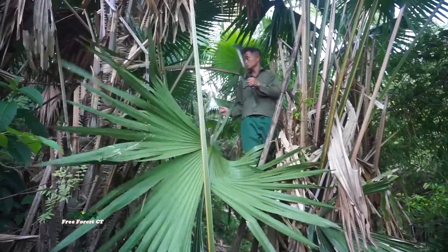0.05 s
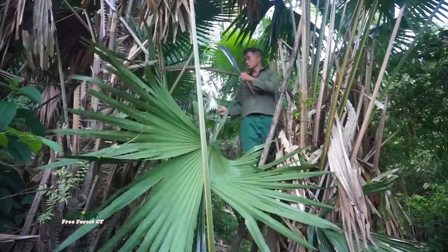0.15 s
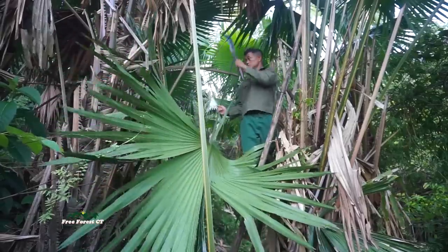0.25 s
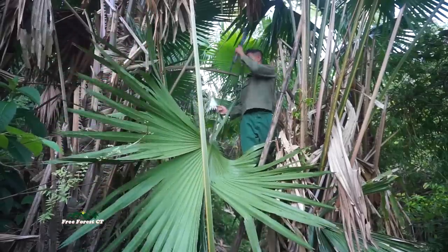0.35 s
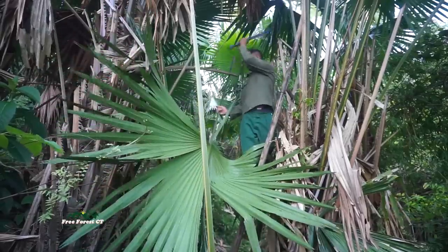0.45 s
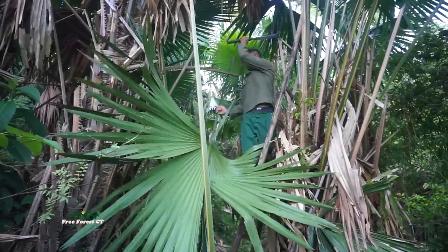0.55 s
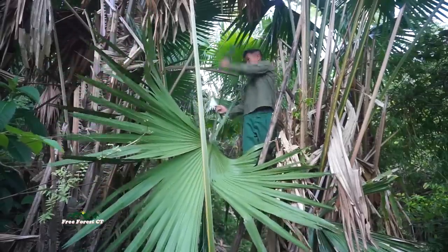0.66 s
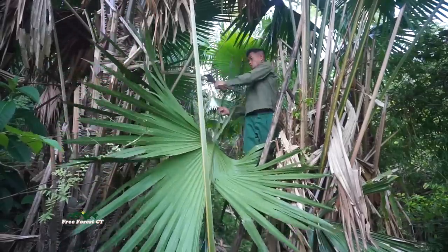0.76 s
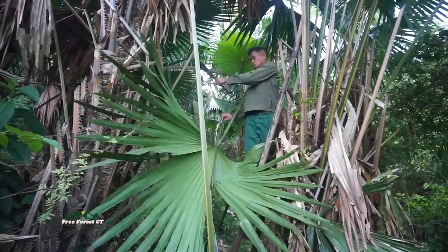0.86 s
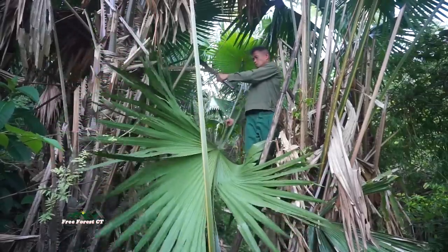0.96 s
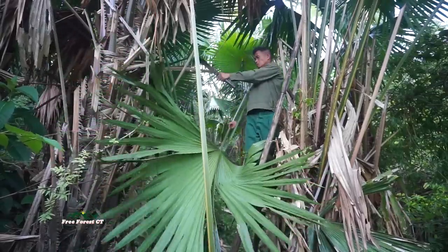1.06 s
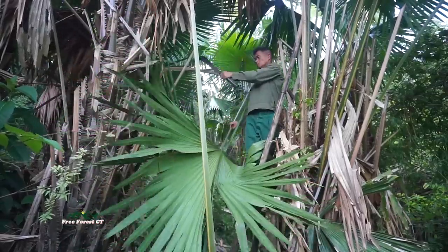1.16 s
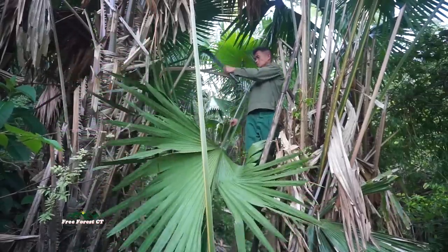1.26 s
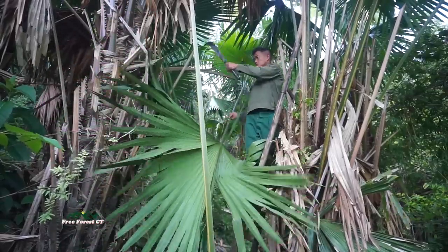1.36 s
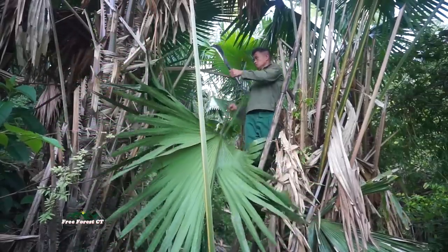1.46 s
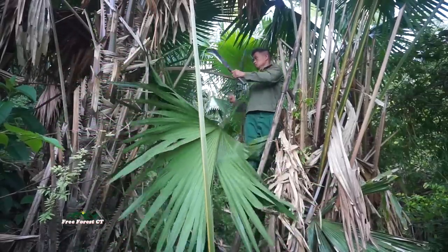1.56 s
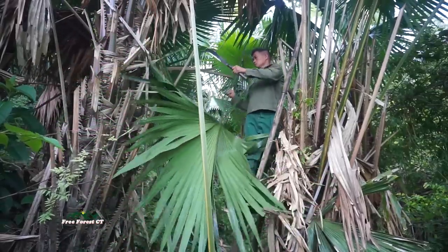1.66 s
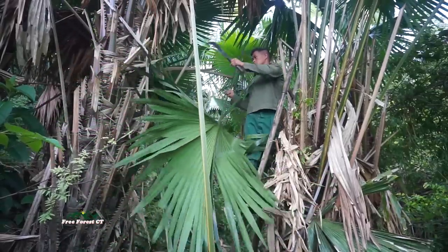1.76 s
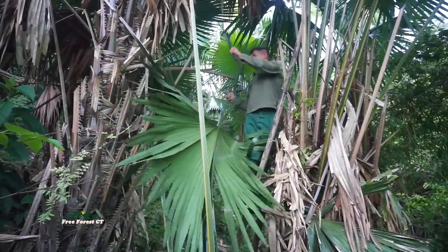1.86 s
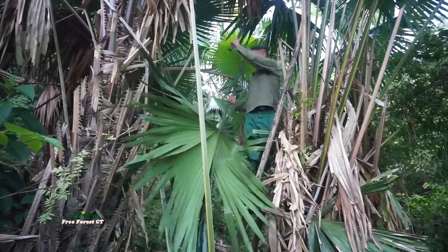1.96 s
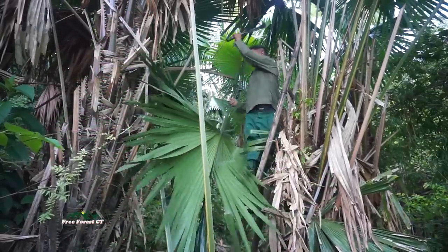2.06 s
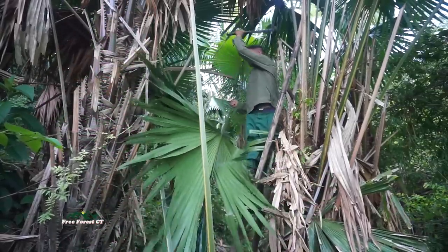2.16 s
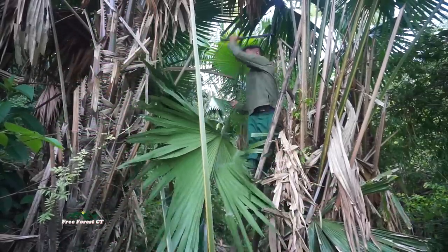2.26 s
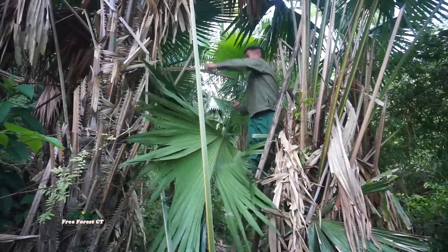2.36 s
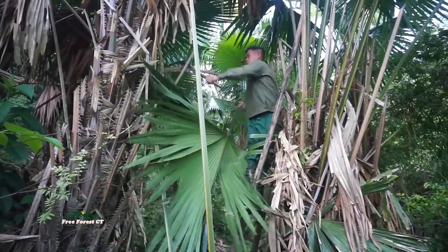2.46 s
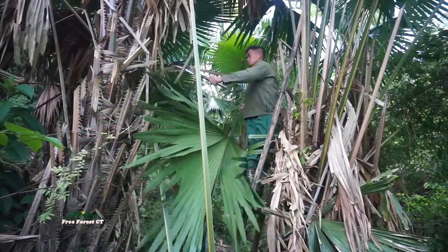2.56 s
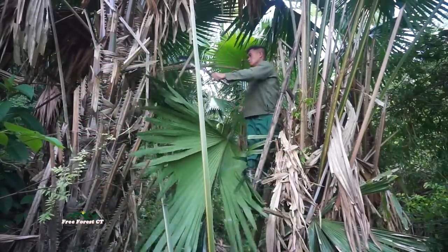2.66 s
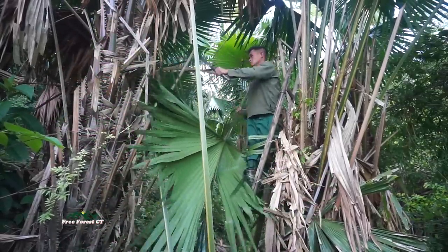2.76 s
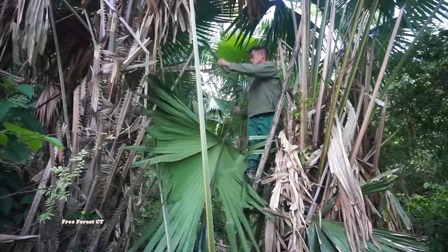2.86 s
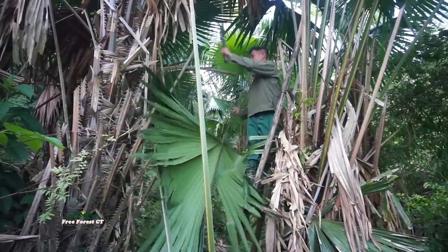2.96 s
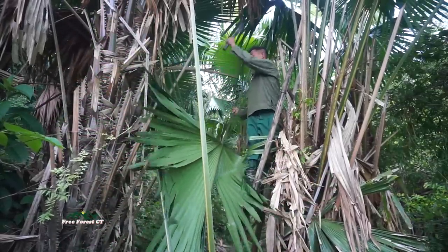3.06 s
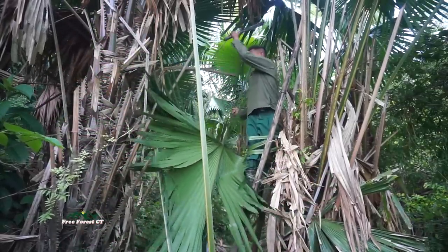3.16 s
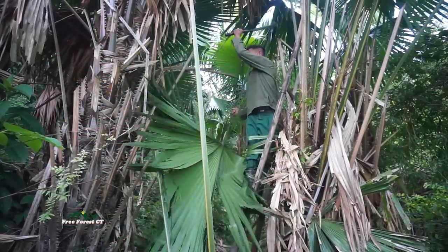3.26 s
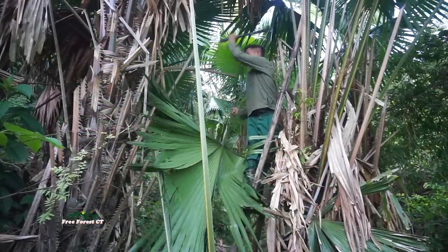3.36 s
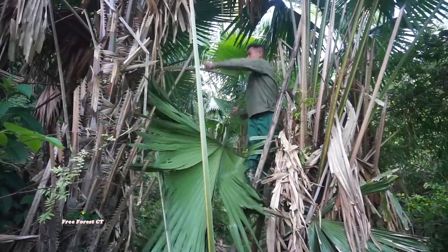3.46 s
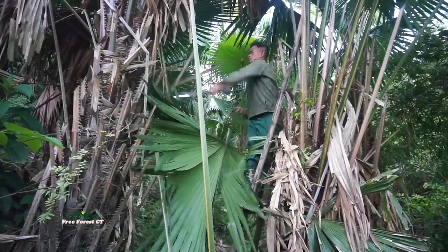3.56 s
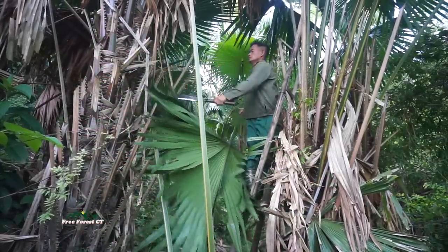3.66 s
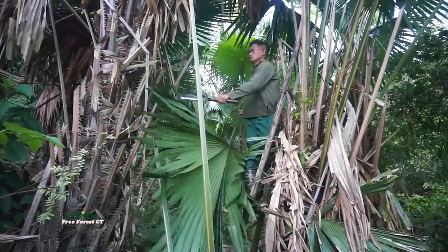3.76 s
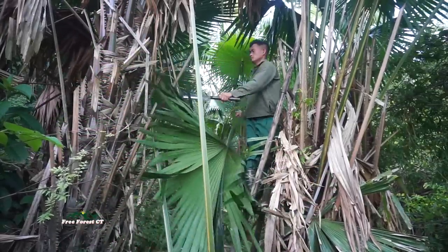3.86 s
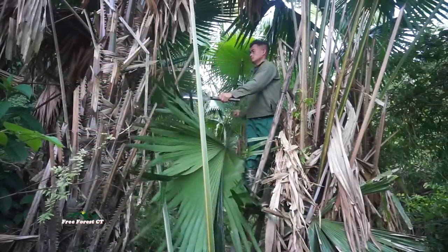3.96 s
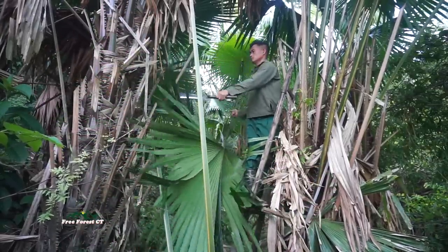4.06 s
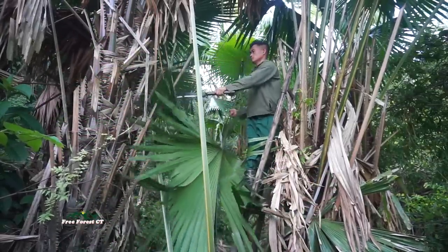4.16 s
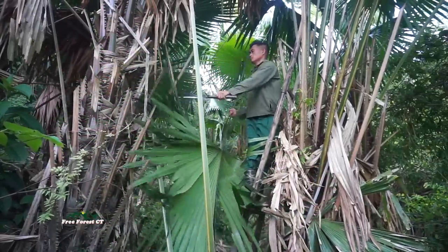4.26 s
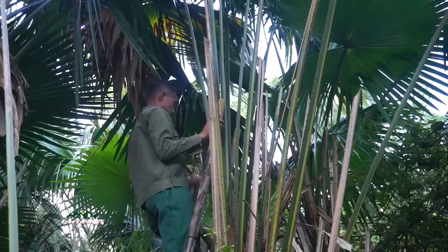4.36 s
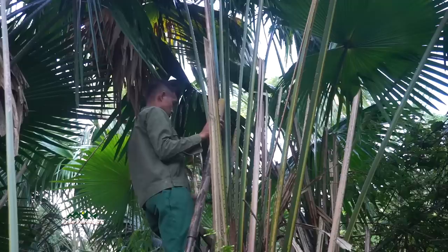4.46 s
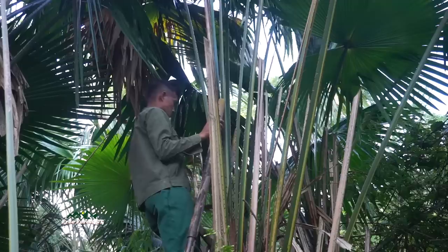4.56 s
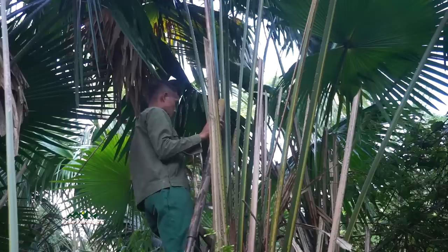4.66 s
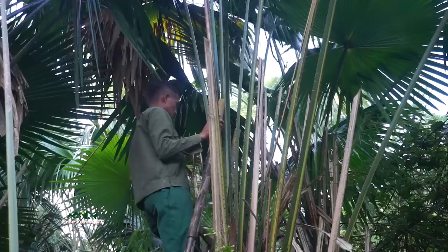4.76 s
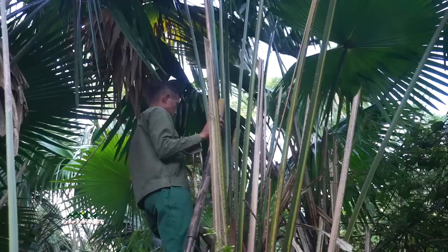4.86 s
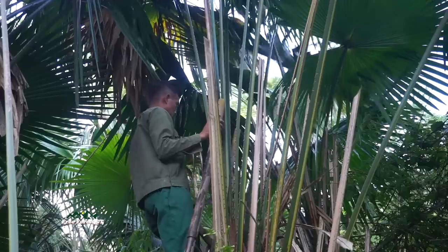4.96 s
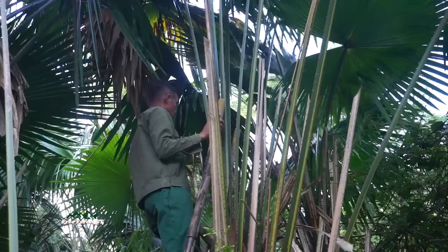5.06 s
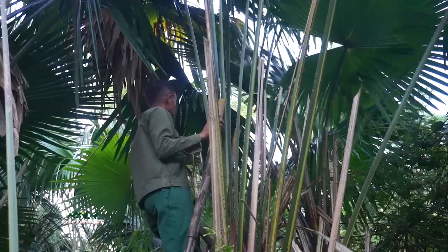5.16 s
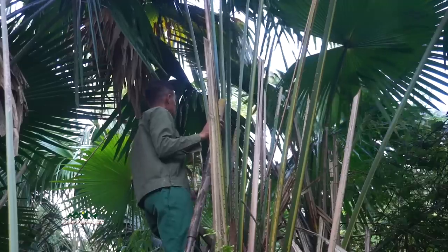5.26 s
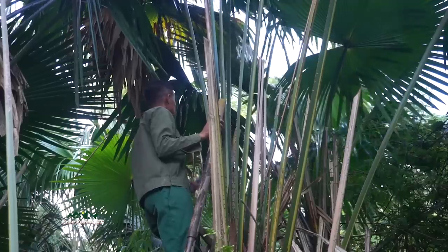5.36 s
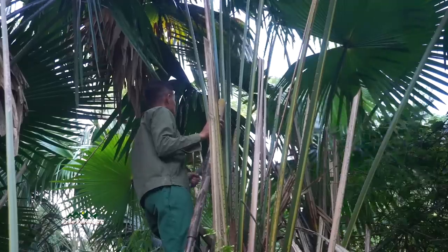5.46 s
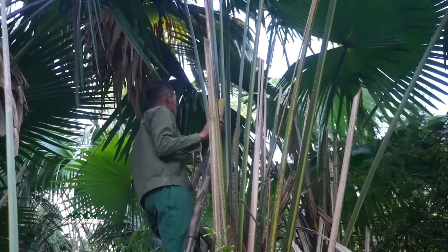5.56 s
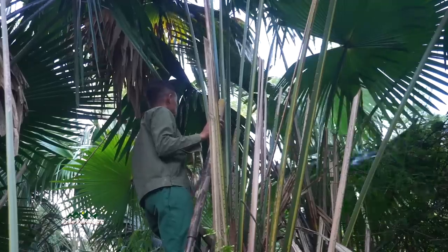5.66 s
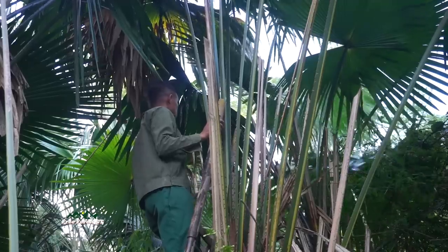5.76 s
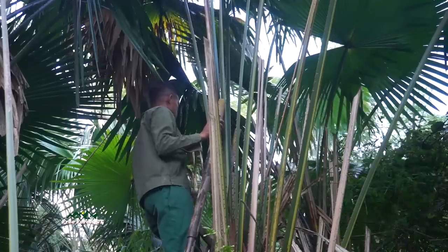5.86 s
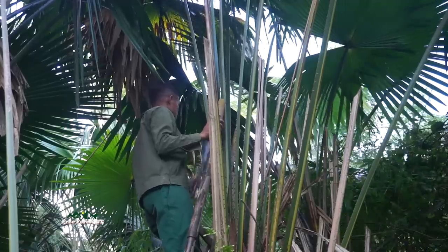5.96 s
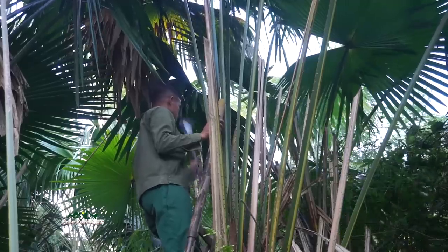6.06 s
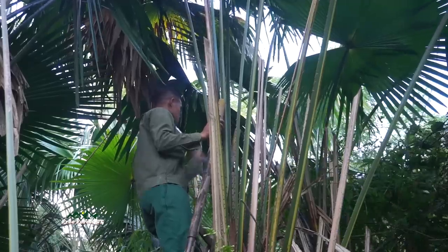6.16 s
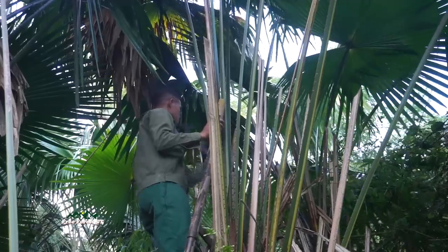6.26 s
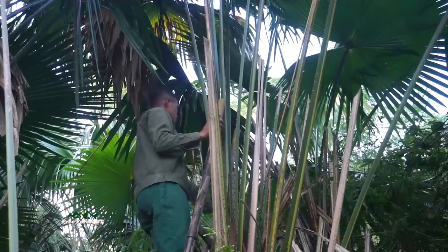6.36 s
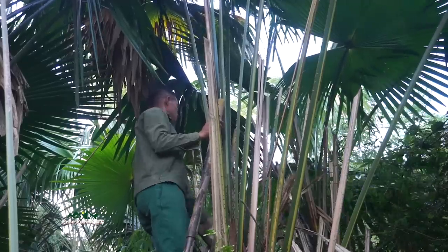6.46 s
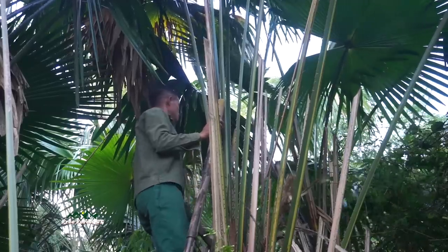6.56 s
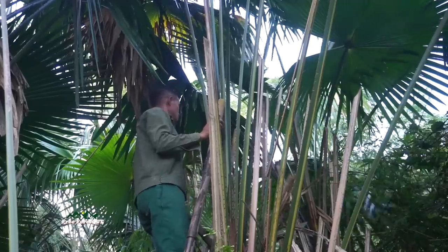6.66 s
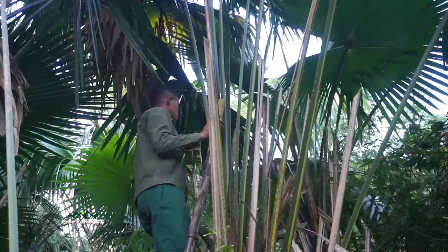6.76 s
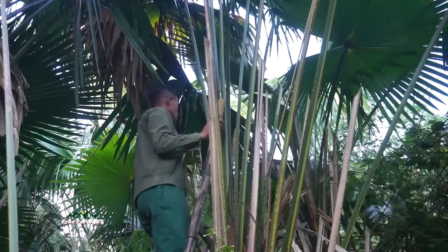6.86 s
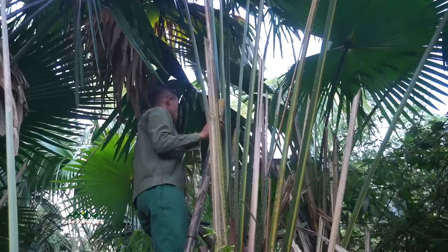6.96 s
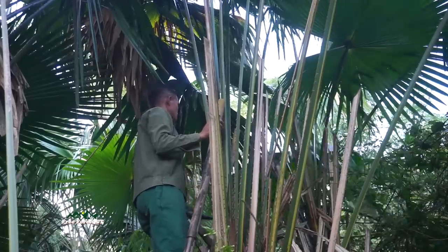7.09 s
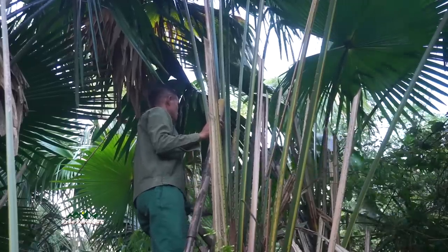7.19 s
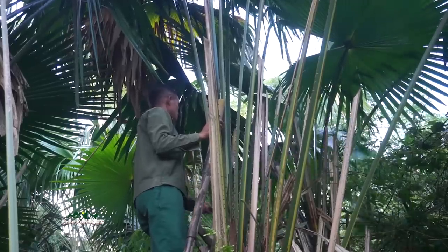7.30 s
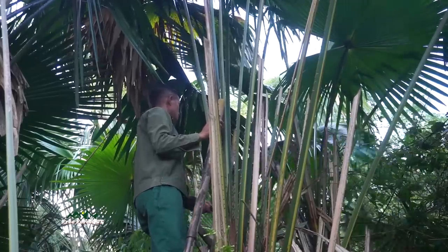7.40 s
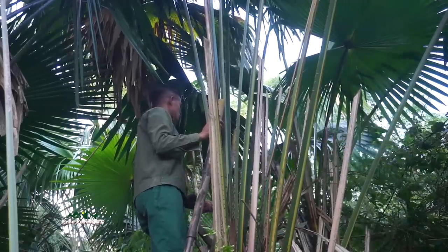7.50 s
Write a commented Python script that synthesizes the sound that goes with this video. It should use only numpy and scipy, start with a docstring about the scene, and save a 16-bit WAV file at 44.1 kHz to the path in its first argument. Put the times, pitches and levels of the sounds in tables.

```python
"""Insects hold a high tone over the hush of a forest (sine tones and filtered noise), from start to end.
Someone pulls and cuts fan-palm fronds there: from the start, leaves flap and dry tips fizz (coloured clicks).
From 0.2 s on, fibres tear in sharp cracks and hollow stalks knock (dying bursts of clicks); stiff ribs
clack from 1 s and leaves brush past from 1.4 s. The level of the palm sounds dips briefly near 4.45 s;
a knife blade rings at 4.48 s (fading sines). Pulls and cracks go on to the end, with echoes."""
import sys
import numpy as np
from scipy import signal
from scipy.fft import rfft, irfft, next_fast_len
from scipy.io import wavfile
from scipy.ndimage import uniform_filter1d

SR = 44100
rng = np.random.default_rng(int(sys.argv[2]) if len(sys.argv) > 2 else 0)


def unload_wav(signal):
    """Save mono or channel-first audio to the path in sys.argv[1] as 16-bit WAV at rate SR, clipped to [-1, 1]."""
    wavfile.write(
        sys.argv[1],
        SR,
        np.round(np.clip(np.atleast_2d(signal).T, -1, 1) * 32767).astype(np.int16),
    )


N = 332073
TIME = np.arange(N) / SR

# Levels in the event tables are relative: each sound adds its own trim in dB.
# Spectra give only the shape of a sound, as power per Hz: f/Hz, level/dB.

# Far forest: spectrum [f/Hz, level/dB]
HUSH_SPECTRUM = [(25, -54), (90, -41), (160, -17.5), (230, -8.5), (340, -9.5), (480, 0.5), (800, -1.5),
                 (1300, -6), (2100, -1.5), (3500, -3.5), (5300, -2), (6300, -8.5), (11000, -21.5)]
# Middle of the nearest insect's pitch, which also trembles: [t/s, f/Hz]
INSECT_PITCH = [(0, 4555), (.6, 4525), (1.8, 4555), (2.3, 4520), (2.8, 4515), (3.15, 4575), (3.5, 4535),
                (4.55, 4530), (5, 4590), (5.4, 4540), (5.85, 4570), (6.3, 4540), (7.53, 4562)]
NEIGHBOUR_HZ = 4485  # middle of the second insect's pitch
# Tones of the ringing knife blade: [f/Hz, level/dB, time to fade by 60 dB t60/s]
BLADE_TONES = [(2498, -39, .6), (3600, -43, .25)]
BLADE_START_S = 4.482
# Hollow stalks knocking: [t/s, level/dB, f/Hz]
KNOCKS = [(.214, -23.5, 1000), (.763, -19, 760), (.781, -19, 530), (.807, -23, 514), (.824, -21.5, 795),
          (.868, -27, 503), (.961, -14.5, 787), (1.088, -21, 720), (1.173, -20.5, 960), (1.221, -32, 581),
          (2.445, -22, 580), (2.474, -22, 511), (2.493, -18, 650), (2.503, -19.5, 507), (2.538, -19.5, 485),
          (2.626, -21, 650), (3.556, -27, 630), (3.652, -24.5, 850), (3.824, -19, 526), (3.875, -27.5, 945),
          (3.978, -25.5, 950), (4.326, -26, 580), (4.481, -23, 842), (4.561, -28.5, 720),
          (4.602, -17.5, 604), (4.718, -28, 498), (4.807, -27.5, 966), (5.353, -31.5, 468),
          (6.432, -24, 563), (6.494, -17, 724), (6.505, -24, 710), (6.565, -25.5, 681), (6.879, -32, 795),
          (7.358, -29, 340)]
# Hollow stalk: spectrum [f/Hz, level/dB]
STALK_SPECTRUM = [(30, -71), (90, -27), (160, -22.5), (250, -7.5), (350, -2.5), (520, 4), (850, 1),
                  (1400, -2.5), (3000, -12), (11000, -49)]
# Low thump of a leaf: spectrum [f/Hz, level/dB]
THUD_SPECTRUM = [(25, -45), (70, -23.5), (110, -17), (170, -3.5), (260, 3.5), (350, -2), (700, -41),
                 (11000, -76)]
# Ribs clacking, and one bright, sharp fibre snap at 3.878 s: [t/s, level/dB, f/Hz]
RIBS_AND_SNAP = [(0.9613, -18, 2100), (.962, -18.5, 2620), (1.089, -24, 1990), (1.213, -26.5, 2170),
                 (2.4704, -22, 2250), (3.811, -23.5, 2320), (3.8773, -19, 2200), (3.878, -30.5, 8600),
                 (3.9843, -18.5, 4630), (4.9355, -34, 2100), (6.799, -29, 2140), (7.304, -32.5, 3020),
                 (7.359, -25.5, 3600), (7.509, -25.5, 3570)]
# A frond is pulled, swings and settles: [peak t/s, swell/s, settling t60/s, tip fizz level/dB, leaf flap level/dB]
PULLS = [(.05, 0.43, 0.82, -43, -41), (.82, 0.097, 1.43, -33, -40.5), (.98, .06, 1.56, -38.5, -44.5),
         (1.51, 0.22, 1.49, -31, -36.5), (2.6, 0.26, 1.02, -37.5, -40.5), (3.1, 0.8, 1.3, -41.5, -51.5),
         (3.61, 0.09, 0.92, -28.5, -39), (3.71, 0.13, 0.36, -41, -35.5), (3.95, 0.33, .25, -37.5, -41),
         (4.33, 0.27, 1.5, -38, -41.5), (4.66, 0.28, 2.8, -43.5, -42), (4.98, 1, 5.7, -37.5, -45.5),
         (5.38, 0.21, 2, -56, -42.5), (5.679, 0.078, 3.1, -58.5, -48), (6.63, 0.39, 1.7, -40.5, -41),
         (6.88, 0.38, 2.7, -40, -44.5), (7.16, 0.3, 2.3, -57, -52.5), (7.5, 0.095, 0.9, -41, -42.5)]
# A big leaf heaves with a soft thump: [peak t/s, level/dB, settling t60/s]
HEAVES = [(.86, -36, 0.36), (.98, -45, 1.1), (2.51, -35.5, 0.73), (3.57, -48, 0.68), (3.68, -46, 0.3),
          (4.55, -43, 3.6), (5.37, -48, 0.92), (5.66, -46, 0.7), (5.85, -44.5, .6), (6.485, -33.5, .35),
          (6.6, -45.5, 2.4), (7.36, -43, 0.48), (7.52, -42, .5)]
# Leaves brushing past each other: [peak t/s, level/dB]
SWISHES = [(1.359, -31.5), (1.439, -31), (2.153, -39), (3.712, -30), (4.244, -28), (4.699, -33.5),
           (5.664, -34.5), (5.847, -38), (7.014, -37)]
# Dry tips: spectrum [f/Hz, level/dB]
FIZZ_SPECTRUM = [(200, -73), (800, 1), (2000, 4), (3500, 5), (6000, 4), (9000, 3.5), (11500, 1.5)]
# Broad leaves: spectrum [f/Hz, level/dB]
FLAP_SPECTRUM = [(30, -33), (80, -35), (140, -32), (230, -10.5), (350, -2), (500, 4.5), (800, 0.5),
                 (1300, -2.5), (2300, -5), (4500, -17.5), (11000, -27)]
# Fibres tearing: [t/s, level/dB, woody middle against treble/dB, first snap against tear/dB]
CRACKS = [(.2163, -21.5, 1.5, 9), (.7598, -10.5, -8.5, 8), (.7662, -21, 2, -1), (.7829, -12.5, -27, -1),
          (.9593, -21, -6, 0), (1.0849, -23, 5, 6), (1.1718, -30.5, 10, -3), (2.1285, -22.5, -23, -4),
          (2.4415, -10, -37, 7), (2.4698, -22.5, 10, 4), (2.4934, -16, 4, -8), (2.5416, -18, 3, 2),
          (2.5575, -16.5, -24, 7), (2.6255, -28, 12, 4), (3.1752, -22, -6, 6), (3.5515, -11, -38, -1),
          (3.5855, -12.5, -4, -9), (3.7275, -13.5, -30, 6), (3.7835, -15.5, -22, 9), (3.8097, -17, 1, -1),
          (3.8772, -14, -18, 8), (3.9737, -20, -19, -3), (3.9822, -16, -20, -14), (4.2163, -22, -15, -1),
          (4.4785, -11, -42, 1), (4.4832, -17, -3, 6), (4.6025, -37, 10, 6), (4.9354, -19.5, -10, 6),
          (5.354, -26, 6, 3), (6.4324, -15.5, -22, -14), (6.4373, -11, -12, -14), (6.4939, -20, -16, -5),
          (6.6667, -38, 19, -2), (6.7979, -25.5, -4, -6), (7.304, -29, 3, 3), (7.358, -16, -18, -6),
          (7.4758, -15.5, -3, 4), (7.5111, -18, -18, 1)]
# Thin fibres: spectrum [f/Hz, level/dB]
TEAR_SPECTRUM = [(200, -25), (1000, -10.5), (2500, 0), (4000, 0), (6500, 1), (9000, 0.5), (11500, -0.5)]
# Thick fibres: spectrum [f/Hz, level/dB]
SPLINTER_SPECTRUM = [(200, -55.5), (700, 15.5), (1300, 0), (2200, 5), (3200, 7), (5500, -15), (11000, -32)]
# How alike the two microphones hear: [f/Hz, likeness from 0 to 1]
MIC_LIKENESS = [(40, 0.63), (130, 1), (500, 0.96), (1200, 1), (2500, 0.32), (4500, 0.65), (8000, 0.11),
                (11000, 0.14)]
# How much louder the left side is: [f/Hz, level/dB]
LEFT_LEAN = [(60, 0.5), (130, 1.3), (270, 0.6), (580, 1.6), (1220, 2.8), (2600, 4.8), (5530, 10),
             (11800, 10.5)]
# How far the left side leads in phase: [f/Hz, phase/rad]
LEFT_LEAD = [(0, 2), (430, -1.5), (1030, -1.84), (2760, -1.25), (8010, -2), (10700, 1), (11900, 0.087)]


def amp(db):
    """Turns decibels into a gain."""
    return 10 ** (np.asarray(db) / 20)


def evened(x):
    """Scales a sound to an average strength (rms) of 1."""
    return x / np.sqrt(np.mean(x ** 2) + 1e-20)


def read(points, hz):
    """Reads a table between its points, on a log-frequency axis."""
    f, value = np.transpose(points)
    return np.interp(np.log(hz + 1), np.log(f + 1), value)


def add(mix, s, sound):
    """Adds a sound into the mix at time s."""
    start = max(round(s * SR), 0)
    part = mix[:, start:][:, :sound.shape[-1]]
    part += sound[..., :part.shape[1]]


def colour(x, spectrum, size=4096):
    """Shapes a sound with a filter that never acts early, so clicks keep their sharp start."""
    hz = abs(np.fft.fftfreq(size, 1 / SR))
    log_gain = np.log(amp(read(spectrum, hz)))
    # the Hilbert transform finds the phase that packs the energy at the start
    response = np.exp(np.conj(signal.hilbert(log_gain)))
    taps = np.fft.ifft(response).real[:size // 2]
    taps = taps / np.linalg.norm(taps)
    return signal.oaconvolve(x, taps[None], axes=1)[:, :x.shape[1]]


def drift(per_s, size=2048):
    """A slow random wander of about rms 1; wandering faster than the given rate is weakened."""
    hz = np.fft.rfftfreq(size, TIME[-1] / size)
    spectrum = rfft(rng.standard_normal(size)) / (1 + (hz / per_s) ** 2)
    slow = evened(irfft(spectrum))
    return np.interp(TIME, np.linspace(0, TIME[-1], size), slow)


def clicks(per_s, spread_db, size):
    """Two trains of random clicks with mean power 1: many small, a few large."""
    height = amp(spread_db * np.minimum(rng.exponential(1, size), 4))
    height = height * (rng.random(size) < per_s / SR)
    signs = rng.choice([-1., 1.], (2, size))
    return evened(height * signs)


def resonate(x, hz, width_hz):
    """Rings like one damped hollow or string; a wider resonance dies faster."""
    r = np.exp(-np.pi * width_hz / SR)
    turn = 2 * np.pi * hz / SR
    gain = np.sqrt((1 - r * r) / 2)
    return signal.lfilter(gain * np.array([1, 0, -1]), [1, -2 * r * np.cos(turn), r * r], x)


def whistle(hz, width_hz):
    """Noise squeezed into a narrow band by two equal resonances, with rms 1."""
    noise = rng.standard_normal((2, N))
    once = resonate(noise, hz, width_hz)
    return evened(resonate(once, hz, width_hz))


def hush():
    """The far forest is coloured noise that swells slightly, over a faint low drone."""
    air = colour(rng.standard_normal((2, N)), HUSH_SPECTRUM)
    air = amp(-47) * air * amp(0.42 * drift(per_s=7.1))
    drone = whistle(hz=258, width_hz=45)
    return air + amp(-69.0) * drone


def singer(pitch):
    """One insect: a pure tone follows a pitch in Hz while its loudness trembles."""
    tone = np.sin(2 * np.pi * np.cumsum(pitch) / SR)
    return evened(tone * amp(2.6 * drift(per_s=5)))


def insects():
    """A near insect and a neighbour sing trembling tones over a blurred chorus of far ones."""
    near = singer(np.interp(TIME, *np.transpose(INSECT_PITCH)) + 12 * drift(per_s=30))
    neighbour = singer(NEIGHBOUR_HZ + 25 * drift(per_s=2) + 12 * drift(per_s=30))
    chorus = whistle(hz=4560, width_hz=240)
    return amp(-52.0) * near + amp(-52.5) * neighbour + amp(-49.5) * chorus


def blade():
    """The steel rings faintly as it leaves the stalk: pure tones that fade away."""
    mix = np.zeros((2, N))
    t = np.arange(SR // 2) / SR
    for hz, db, t60 in BLADE_TONES:
        add(mix, BLADE_START_S, amp(db - 60 * t / t60) * np.sin(2 * np.pi * hz * t))
    return mix


def knocks():
    """A hit hollow stalk chatters briefly with one heavily damped note, and shakes its leaf with a thud."""
    wood, thud = np.zeros((2, 2, N))
    t = np.arange(SR // 3) / SR
    for s, db, hz in KNOCKS:
        chatter = clicks(per_s=1500, spread_db=0.0, size=len(t)) * amp(-60 * t / 0.13)  # t60 in s
        chatter[:, 0] += 9  # the first hit
        note = resonate(chatter, hz, width_hz=84)
        add(wood, s, amp(db - 7.5) * (0.63 * chatter + 0.11 * note))
        add(thud, s + 0.0024, amp(db - 38) * chatter)
    return colour(wood, STALK_SPECTRUM) + colour(thud, THUD_SPECTRUM)


def ribs_and_snap():
    """A rib springs free and rattles on its own note; one bright fibre snap is made the same way."""
    mix = np.zeros((2, N))
    t = np.arange(SR // 8) / SR
    for s, db, hz in RIBS_AND_SNAP:
        rattle = clicks(per_s=3300, spread_db=6.0, size=len(t)) * amp(-60 * t / 0.052)  # t60 in s
        rattle[0, 0] += 8  # the sharp start
        add(mix, s, amp(db - 4.5) * resonate(rattle, hz, width_hz=0.17 * hz))
    return mix


def swing(peak_s, swell_s, t60):
    """Gain of one movement: it grows tenfold in the swell time, then dies away by 60 dB in t60."""
    late = TIME - peak_s
    growing_db = 20 * late / max(swell_s, .01)
    settling_db = -60 * late / max(t60, .05)
    return amp(np.minimum(growing_db, settling_db))


def movement():
    """Levels in dB of the dry tips, broad leaves and low heaving; separate movements add in power."""
    # the leaves never hang quite still
    fizz, flap = amp(-49) ** 2, amp(-57.5) ** 2
    for s, swell_s, t60, fizz_db, flap_db in PULLS:
        power = swing(s, swell_s, t60) ** 2
        fizz = fizz + amp(fizz_db) ** 2 * power
        flap = flap + amp(flap_db) ** 2 * power
    # any flapping also carries a little low weight
    heave = flap * amp(-18) ** 2
    for s, db, t60 in HEAVES:
        heave = heave + (amp(db) * swing(s, swell_s=0.074, t60=t60)) ** 2
    return 10 * np.log10([fizz, flap, heave])


def pops(lo_hz, hi_hz, cycles, spread_db, count):
    """Scattered buckles of a leaf, each swelling for a moment on its own hollow note."""
    when, pitch, strength, turn, other_turn = rng.random((count, 5)).T[:, :, None]
    t = np.arange(SR // 60)
    turns = lo_hz * (hi_hz / lo_hz) ** pitch * t / SR
    height = amp(-spread_db * np.log(np.maximum(strength, .05)))
    ring = height * turns * np.exp(-turns / cycles)
    at = ((when * N).astype(int) + t).ravel()
    mix = []
    for start in (turn, other_turn):
        sound = ring * np.sin(2 * np.pi * (turns + start))
        mix.append(np.bincount(at, sound.ravel(), N)[:N])
    # keeps the pops free of rumble below their notes
    no_rumble = signal.butter(2, lo_hz / 2, "high", fs=SR, output="sos")
    return evened(signal.sosfilt(no_rumble, np.array(mix)))


def fronds():
    """Dry tips tick in clumps, ribs crinkle, broad leaves buckle with duller pops, and big leaves heave."""
    fizz_db, flap_db, heave_db = movement()
    clumps = drift(per_s=24)
    brushing = np.zeros(N)
    for s, db in SWISHES:
        brushing += amp(db) * np.exp(-.5 * ((TIME - s) / 0.018) ** 2)  # bell width in s
    tips = np.hypot(amp(fizz_db + 0.84), brushing) * amp(0.94 * clumps)
    fizz = colour(clicks(per_s=4000, spread_db=0.5, size=N), FIZZ_SPECTRUM) * tips
    crinkle = pops(lo_hz=1400, hi_hz=5000, cycles=1.3, spread_db=3.5, count=1400)
    crinkle *= amp((fizz_db + flap_db) / 2 - 9.5)
    buckles = pops(lo_hz=470, hi_hz=1100, cycles=1.0, spread_db=2.2, count=900) * amp(flap_db - 6.5)
    flap = colour(clicks(per_s=1200, spread_db=2.0, size=N), FLAP_SPECTRUM)
    flap *= amp(flap_db - 1.5 + 2.65 * clumps)
    heave = colour(clicks(per_s=600, spread_db=0.5, size=N), THUD_SPECTRUM) * amp(heave_db - 5.0)
    return fizz + crinkle + buckles + flap + heave


def cracks():
    """One fibre snaps and sets off a dying run of smaller ones; thick fibres add a woody middle."""
    thin, thick = np.zeros((2, 2, N))
    t = np.arange(SR // 4) / SR
    for s, db, woody_db, snap_db in CRACKS:
        run = clicks(per_s=4000, spread_db=2.1, size=len(t)) * amp(-60 * t / 0.16)  # t60 in s
        run[0, 0] = 8 * np.tanh(amp(snap_db))  # the first snap, with a ceiling on its height
        add(thin, s, amp(db - 9.0) * run)
        add(thick, s + 0.000973, amp(db + woody_db - 17.0) * run)
    return colour(thin, TEAR_SPECTRUM) + colour(thick, SPLINTER_SPECTRUM)


def level_dip(start=4.426, end=4.474, depth_db=-7):
    """Gain that makes the level dip briefly, with softened edges; times in s."""
    inside = 1. * ((TIME > start) & (TIME < end))
    return amp(depth_db * uniform_filter1d(inside, size=300))


def scatter(x, t60, delay, count=3):
    """Many weak echoes from leaves and trunks, as fading noise that smears the sound."""
    t = np.arange(SR // 2) / SR
    out = np.zeros((2, N))
    # several echo patterns are mixed in drifting shares, so no steady colour stands out
    shares = np.array([drift(per_s=7.1) for _ in range(count)])
    for share in shares / np.linalg.norm(shares, axis=0):
        taps = rng.standard_normal((2, len(t))) * amp(-60 * t / t60) * (t > delay)
        taps = taps / np.linalg.norm(taps, axis=1, keepdims=True)
        out += signal.oaconvolve(x * share, taps, axes=1)[:, :N]
    return out


def microphones(x):
    """Two ports share part of their sound, shifted in phase; the left is louder, most of all in the treble."""
    size = next_fast_len(N, True)
    hz = np.fft.rfftfreq(size, 1 / SR)
    common, other = rfft(x, size)
    same = np.clip(read(MIC_LIKENESS, hz), 0, 1)
    lean = amp(read(LEFT_LEAN, hz))
    lead = read(LEFT_LEAD, hz)
    left = lean * common
    right = (same * common + np.sqrt(1 - same ** 2) * other) * np.exp(-1j * lead)
    # keeps the level of the two sides added together
    centre = np.sqrt(lean ** 2 + 1 + 2 * lean * same * np.cos(lead)) / 2
    return irfft(np.array([left, right]) / centre, size)[:, :N]


def scene():
    """The work in the palm, echoed by near leaves and far trunks, over the forest."""
    work = blade() + knocks() + ribs_and_snap() + fronds() + cracks()
    near_leaves = amp(-8.5) * scatter(work, t60=0.055, delay=.002)
    far_trunks = amp(-15) * scatter(work, t60=0.35, delay=0.025)
    palm = (work + near_leaves + far_trunks) * level_dip()
    return microphones(hush() + insects() + palm)


def record(dry):
    """The recorder's band limit: a steep filter removes what lies above 11110 Hz."""
    taps = signal.firwin(401, 11110, window=("kaiser", 8), fs=SR)
    return signal.oaconvolve(dry, taps[None], "same", axes=1)


dry = scene()
out = record(dry)
unload_wav(out)
```